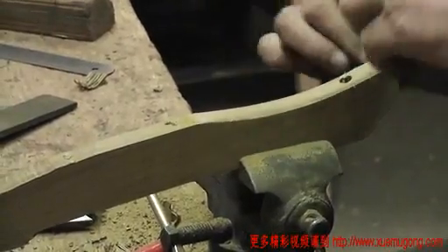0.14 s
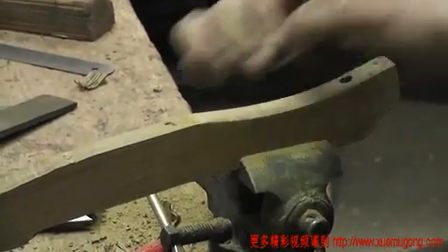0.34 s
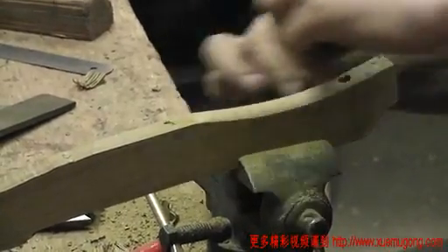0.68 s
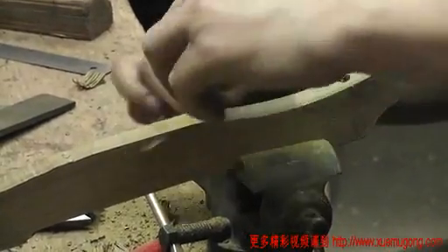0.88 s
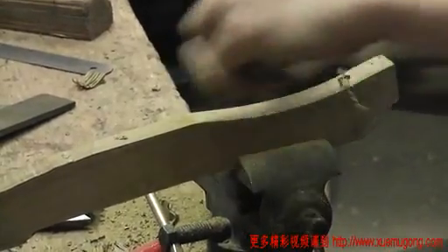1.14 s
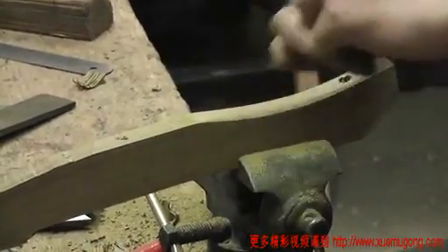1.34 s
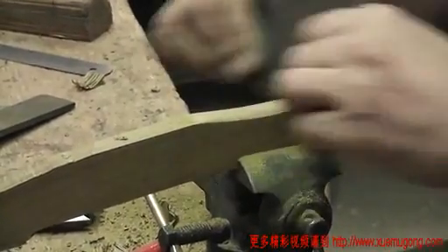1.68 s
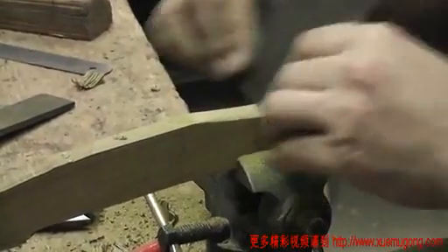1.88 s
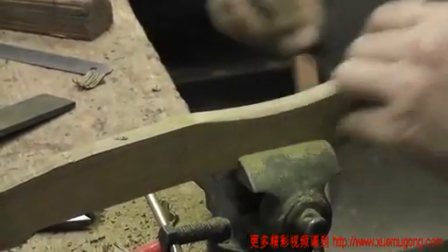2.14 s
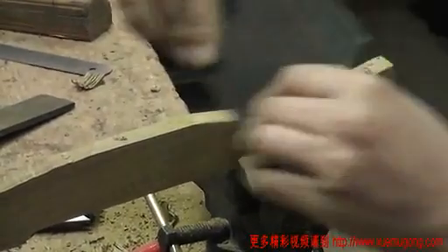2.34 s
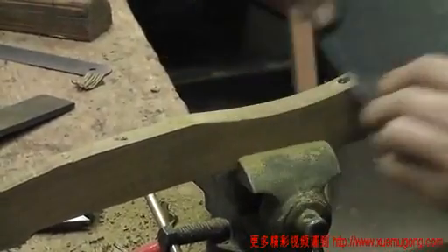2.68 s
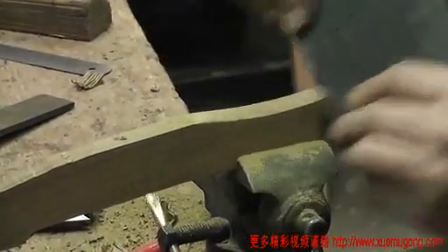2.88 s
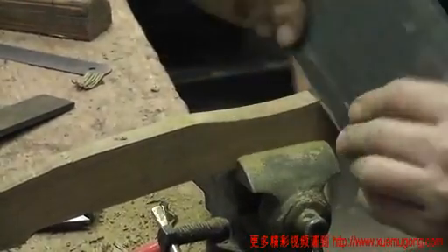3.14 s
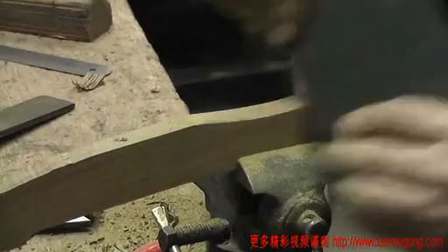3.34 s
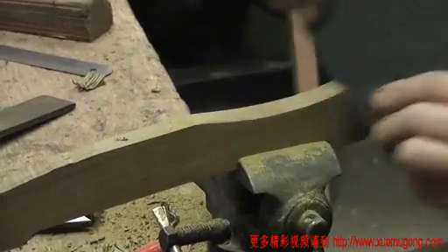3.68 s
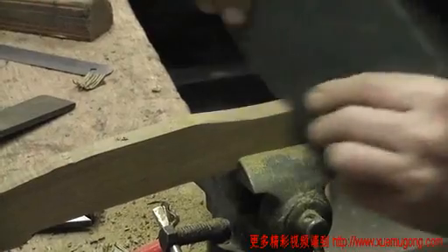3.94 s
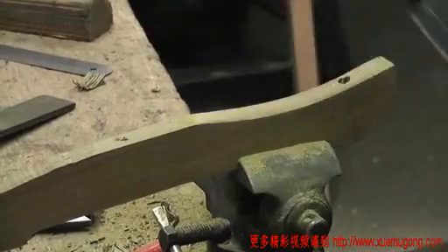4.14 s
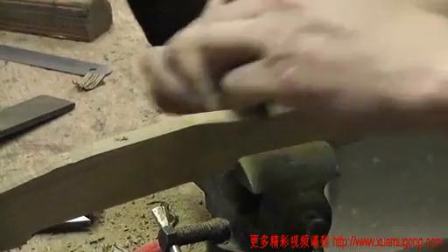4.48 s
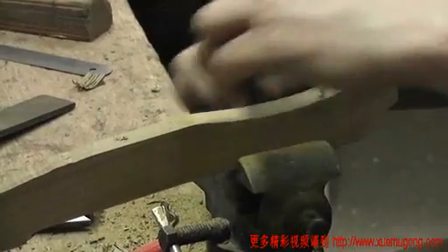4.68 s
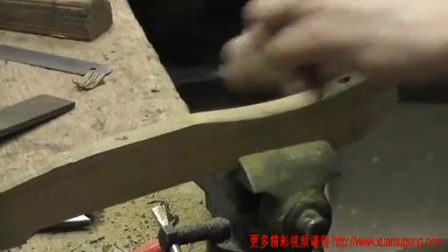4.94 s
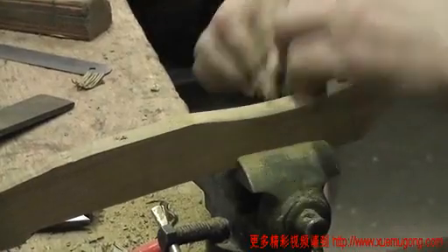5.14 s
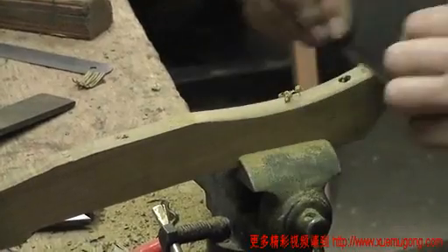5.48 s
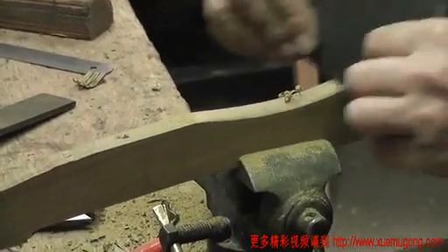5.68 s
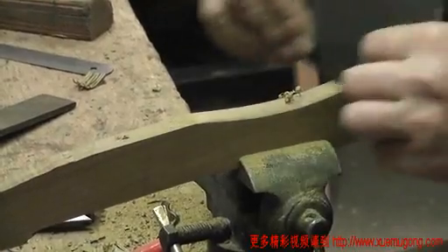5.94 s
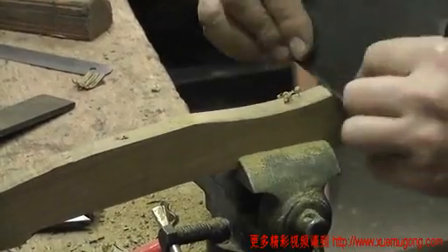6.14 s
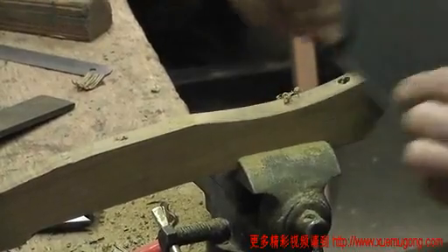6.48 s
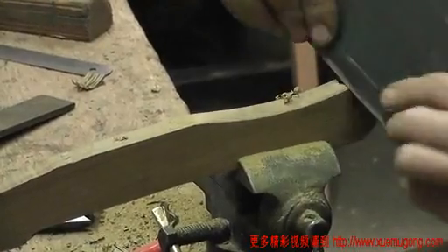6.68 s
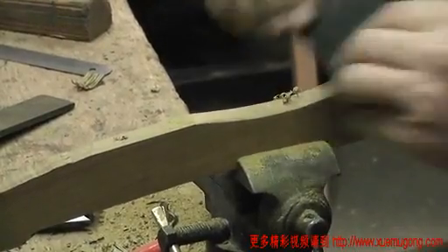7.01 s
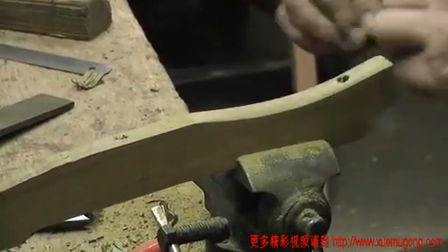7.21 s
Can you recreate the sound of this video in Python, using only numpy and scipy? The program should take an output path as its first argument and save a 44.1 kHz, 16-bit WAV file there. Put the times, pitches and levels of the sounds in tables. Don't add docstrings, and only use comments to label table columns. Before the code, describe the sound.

Short, dry scrapes of steel on wood come two to four a second, heard very close in stereo. Knocks mark the blade landing, and the edge sometimes judders so the wood and bench ring briefly. The middle strokes are spaced with small gaps, three stronger scrapes follow, then rapid little scratches with a sharp fibre snap, more knocks, a pause and a last stroke. Small room, quiet low hum.

```python
import sys
import numpy as np
from scipy import signal
from scipy.fft import rfft, irfft, next_fast_len
from scipy.io import wavfile
from scipy.ndimage import uniform_filter1d, minimum_filter1d, map_coordinates

SR = 44100
rng = np.random.default_rng(int(sys.argv[2]) if len(sys.argv) > 2 else 0)


def gain_from_decibels(decibels):
    exponent = np.asarray(decibels, float) / 20
    return 10 ** exponent


def dump_mix(stems):
    frames = np.atleast_2d(stems).T
    limited = np.clip(frames, -1, 1)
    pcm = np.round(limited * 32767).astype(np.int16)
    wavfile.write(sys.argv[1], SR, pcm)


N = 323253

# start_s, rise_s, hold_s, tear_db, plate_re_tear_db
TOP_CUTS = [(0.07, .044, .005, -24.5, -2.5), (0.485, 0.031, .12, -19.5, -8), (0.846, 0.039, 0.087, -20, -7),
            (1.196, 0.069, 0.094, -20, -5), (1.626, 0.02, 0.099, -19.5, -9.5), (1.827, 0.033, .01, -25, -4),
            (1.913, 0.042, 0.073, -19, -8.5), (2.081, 0.098, 0.058, -24, -1.5),
            (2.276, 0.015, 0.1, -21.5, -11.5), (4.43, 0.067, 0.083, -20, -7.5),
            (4.775, 0.077, 0.11, -18.5, -7.5), (5.168, 0.032, 0.051, -19, -8.5),
            (7.037, 0.02, 0.075, -17.5, -8)]
# start_s, rise_s, hold_s, tear_db, plate_re_tear_db
END_CUTS = [(2.578, 0.018, .13, -18, -5.5), (2.883, 0.038, 0.069, -21.5, -1),
            (3.134, 0.034, 0.05, -21.5, -2.5), (3.505, 0.053, 0.12, -19.5, -5),
            (3.895, 0.042, 0.1, -17, -9.5), (5.439, 0.014, 0.063, -21, -3.5),
            (5.544, 0.069, .005, -26.5, 3.5), (5.66, 0.019, 0.044, -24, -0.5),
            (5.774, 0.073, .005, -25.5, 1), (6.026, .028, 0.032, -29, 7), (6.186, 0.043, 0.0026, -22, -8),
            (5.866, 0.054, 0.055, -22, -2.5), (6.126, 0.031, 0.058, -23, -3),
            (6.447, 0.014, 0.065, -19, -4), (6.718, 0.037, 0.015, -16, -9)]
# start_s, hold_s, tear_db, plate_re_tear_db
SKIDS = [(0.0, 0.11, -30.5, -3), (0.393, 0.049, -27.5, 0), (0.768, 0.029, -21, 2),
         (1.153, 0.01, -27.5, 1.5), (1.562, 0.095, -37, -1), (2.293, .02, -21, -10),
         (0.495, 0.025, -26, 0.5), (2.495, .08, -30, -3), (2.84, 0.0055, -30.5, -3.5),
         (3.101, 0.006, -26, 4.5), (3.373, 0.067, -28, -3), (3.852, 0.0052, -41, -3),
         (4.055, 0.14, -32, -4), (4.343, 0.08, -30.5, 0), (4.718, .06, -35.5, -3.5),
         (5.042, 0.068, -45, -1), (7.27, .02, -46.5, -3), (0.12, 0.14, -39.5, -6),
         (5.13, 0.0082, -29.5, -2), (5.36, 0.037, -32, -1), (6.264, 0.1, -31.5, -3.5),
         (6.397, 0.011, -32.5, 9), (6.555, 0.12, -30.5, -5.5), (6.702, 0.0052, -32.5, 12),
         (6.8, 0.14, -32, -2)]
# start_s, level_db, fade_db_per_s, upper_re_judder_db, bench_re_judder_db
JUDDERS = [(0.0, -30, 150, -4, 1), (0.392, -8.5, 224, -1, 1.5), (0.767, -23.5, 250, 9.5, -17),
           (1.153, -18.5, 202, 5, 6), (1.561, -24, 219, -1.5, 6), (1.837, -23.5, 136, -1.5, -3.5),
           (2.496, -33.5, 83, 5, 1), (2.841, -28.5, 200, -4, -1.5), (3.106, -13.5, 258, -5.5, -3),
           (3.379, -20.5, 150, -1, 4.5), (3.854, -31, 95, -5, 4), (4.346, -7.5, 204, -5, 1),
           (4.718, -22.5, 190, 2, 8.5), (5.133, -8.5, 418, -3, -10.5), (5.36, -21, 197, -3.5, -5),
           (6.05, -19, 186, -6.5, -12), (6.404, -9.5, 302, -5.5, -9), (6.706, -15, 262, -4.5, -6.5),
           (7.028, -25, 157, 1.5, -1.5)]
# start_s, rise_s, level_db, upper_re_judder_db, bench_re_judder_db
SWELLS = [
    (2.076, 0.17, -17, -2, -2.5),
    (2.52, 0.039, -21.5, -16, -8),
    (4.017, 0.041, -29, 0.5, 1),
    (4.9, 0.1, -36, -9, -2),
    (5.544, 0.085, -22.5, -6, -8),
    (5.79, 0.08, -18.5, -4.5, -13),
    (5.96, 0.06, -26, -9, -5),
    (6.8, 0.027, -33.5, -3, 8.5),
]
# start_s, hold_s, level_db, upper_re_judder_db, bench_re_judder_db
DRAGS = [(0.023, 0.14, -31, 0, 1.5), (0.774, 0.052, -19.5, 3.5, 0.5), (2.866, .17, -35, -3.5, -2),
         (3.426, 0.098, -35.5, 5.5, 8), (4.063, 0.1, -36.5, 1, 2), (5.45, 0.078, -37.5, 0, -3),
         (5.68, 0.14, -32, -4, -5.5), (6.144, .22, -34.5, 1, 2), (6.47, 0.18, -34, 2, 6),
         (6.775, 0.14, -37.5, 0.5, 3.5), (7.093, 0.05, -33, -12, -5)]
# rail_db, upper_db, bench_db
CUT_SHAKES_DB = (-33.5, -23, -32)
# rail_db, upper_db, bench_db
REST_DB = (-45.5, -47, -46.5)
# freq_hz, density_db_per_hz
TEAR_HISS = [(2350, -16), (4000, -6), (4820, -11), (5780, -7), (7210, -9.5), (8550, -5), (10500, -9),
             (12100, -7), (14700, -17), (15200, -19), (15500, -34)]
# freq_hz, width_hz, level_db
PLATE = [(1395, 500, -7.5), (1688, 106, 2.5), (1885, 200, -1), (2036, 28, 6.5), (2142, 118, -2.5),
         (2850, 470, -1), (3090, 70, 0.5), (3367, 81, 1), (3750, 57, -1), (4270, 290, -6)]
# freq_hz, width_hz, level_db
RAIL_LOW = [(342.4, 17.8, -3.5), (395.6, 26, -4), (466.6, 18, -13.5)]
# freq_hz, width_hz, level_db
RAIL_HIGH = [(492.4, 41.7, 1.5), (618, 70, 4), (747.4, 60.5, 4.5), (800, 119, 0.5), (1018, 57, -4.5),
             (1137, 84, -6.5)]
# freq_hz, width_hz, level_db
BENCH = [(136.6, 61, -4), (173.5, 20.6, 1.5), (221.5, 21.4, 2), (293.6, 28.5, 0)]
# freq_hz, t60_s
SHOP = [(150, 0.25), (2000, 0.051), (12000, 0.032)]
# freq_hz, level_db
NEARNESS = [(100, -37), (1000, -7.5), (12000, -10.5)]
# freq_hz, density_db_per_hz
AIR = [(25, -40), (50, 2.5), (83, 10.5), (100, -16), (150, 4.5), (462, -21), (790, -16), (1670, -10.5),
       (2500, -20), (6200, -22.5), (12800, -39), (15000, -42)]
# start_s, peak_db, crack_re_knock_db
LANDINGS = [(0.3896, 11, -13.5), (0.411, 1, -16), (0.773, -1, -24), (1.152, 2.5, -42), (1.189, -21, -35),
            (1.561, -6.5, -47), (1.841, -22, -20), (2.226, -5, -19), (2.85, -20.5, 9), (3.103, -3, -8),
            (3.38, -3.5, -22), (3.854, -9, -14.5), (4.344, 8, -25), (4.371, 2, -28), (4.717, 0.5, -35),
            (5.129, 5.5, -37), (5.361, -3.5, -23), (5.855, -6.5, 3.5), (6.053, -16, -23), (6.403, 8.5, -13),
            (6.705, 3.5, -26), (7.028, 3, -13.5)]
# start_s, peak_db
SNAPS = [
    (3.618, -18),
    (6.2333, 12),
    (6.528, -1),
]
# freq_hz, width_hz, level_db
THUMP = [(477, 120, 17), (1910, 360, -15)]
# start_s, rise_s, both_ports_db, opposite_sign_db
BUMPS = [
    (3.617, .0047, -23, -36),
    (3.5805, .0014, -45, -12),
    (6.2352, .0012, -40, -7),
]
# freq_hz, gain_db
WIDTH = [(40, 0), (200, -1), (2100, -4), (2600, -28), (5300, -14), (5600, -4.5), (6400, -0.5),
         (7200, -12.5), (10200, -13), (10500, 0.5), (12000, -4), (14500, -19)]

TOP_RISE_DB, TOP_SAG_DB_PER_S, TOP_LIFT_DB_PER_S = 16, 50, 224
END_RISE_DB, END_SAG_DB_PER_S, END_LIFT_DB_PER_S = 26.5, 41, 269
SKID_RISE_S, SKID_RISE_DB, SKID_SAG_DB_PER_S, SKID_LIFT_DB_PER_S = 0.0022, 9, 51, 288
DRAG_RISE_S, DRAG_RISE_DB, DRAG_SAG_DB_PER_S, DRAG_LIFT_DB_PER_S = 0.0074, 11, 19, 262
JUDDER_RISE_S, JUDDER_RISE_DB, JUDDER_HOLD_S = 0.0013, 2, 0.006
SWELL_RISE_DB, SWELL_FADE_DB_PER_S = 13.5, 304
BITE = 1.32
PLATE_FOLLOWS = 0.74
UPPER_FOLLOWS, BENCH_FOLLOWS = 1.63, 1
HOVER_DB, HOVER_PLATE_DB = -59.5, -53


def unit(x):
    return x / np.sqrt(np.mean(x ** 2) + 1e-20)


def along(points, hz):
    f, v = np.transpose(points)
    return np.interp(np.log(hz + 1), np.log(f + 1), v)


def wobble(rate_hz):
    knots = rng.standard_normal(int(N * rate_hz / SR) + 4)
    return map_coordinates(knots, [np.arange(N) * rate_hz / SR])


def filtered(x, response):
    m = next_fast_len(N + SR // 2)
    return irfft(rfft(x, m) * response(np.fft.rfftfreq(m, 1 / SR)), m)[..., :N]


def modes(table):
    def ring(f):
        total = 0
        for k, (freq_hz, width_hz, db) in enumerate(table):
            damping = 1j * f * width_hz
            total = total + (-1) ** k * gain_from_decibels(db) * damping / (freq_hz ** 2 - f * f + damping)
        return total

    return lambda f: ring(f) / np.sqrt(np.mean(np.abs(ring(f)) ** 2))


def slips(rate_hz, size_db, clump_db, smooth):
    hits = rng.random(N) < rate_hz / SR
    jolts = hits * rng.standard_normal(N) * gain_from_decibels(size_db * rng.standard_normal(N))
    force = unit(jolts) + smooth * rng.standard_normal(N)
    return unit(force * gain_from_decibels(clump_db * wobble(70)))


def patchy(x, depth_db, bins, frames):
    z = signal.stft(x, nperseg=512)[2]
    field = uniform_filter1d(rng.standard_normal(z.shape), bins, 0)
    field = uniform_filter1d(field, frames, 1)
    return signal.istft(z * gain_from_decibels(depth_db * unit(field)), nperseg=512)[1][:N]


def shape(rise_s, hold_s, rise_db, sag_db_per_s, lift_db_per_s):
    t = np.arange(SR // 2) / SR - rise_s
    climb = -rise_db * np.abs(t / rise_s) ** BITE
    fall = -sag_db_per_s * t - lift_db_per_s * np.maximum(t - hold_s, 0)
    return np.where(t < 0, climb, fall)


def add(power, start_s, shape_db, levels_db, follows):
    k = round(start_s * SR)
    power[:, k:k + len(shape_db)] += gain_from_decibels(2 * (np.c_[levels_db] + np.c_[follows] * shape_db))


def tearing():
    power = np.ones(N + SR) * gain_from_decibels(2 * np.c_[[HOVER_DB, HOVER_PLATE_DB]])
    events = []
    for s, rise, hold, db, plate_db in TOP_CUTS:
        events.append((s, db, plate_db, shape(rise, hold, TOP_RISE_DB, TOP_SAG_DB_PER_S, TOP_LIFT_DB_PER_S)))
    for s, rise, hold, db, plate_db in END_CUTS:
        events.append((s, db, plate_db, shape(rise, hold, END_RISE_DB, END_SAG_DB_PER_S, END_LIFT_DB_PER_S)))
    for s, hold, db, plate_db in SKIDS:
        skid = shape(SKID_RISE_S, hold, SKID_RISE_DB, SKID_SAG_DB_PER_S, SKID_LIFT_DB_PER_S)
        events.append((s, db, plate_db, skid))
    for s, db, plate_db, shape_db in events:
        add(power, s, shape_db, [db, db + plate_db], [1, PLATE_FOLLOWS])
    return np.sqrt(power[:, :N])


def juddering(tear):
    power = np.ones(N + SR) * gain_from_decibels(2 * np.c_[list(REST_DB)])
    events = []
    for s, db, fade, upper_db, bench_db in JUDDERS:
        events.append((s, db, upper_db, bench_db, shape(JUDDER_RISE_S, JUDDER_HOLD_S, JUDDER_RISE_DB, 0, fade)))
    for s, rise, db, upper_db, bench_db in SWELLS:
        events.append((s, db, upper_db, bench_db, shape(rise, 0, SWELL_RISE_DB, 0, SWELL_FADE_DB_PER_S)))
    for s, hold, db, upper_db, bench_db in DRAGS:
        drag = shape(DRAG_RISE_S, hold, DRAG_RISE_DB, DRAG_SAG_DB_PER_S, DRAG_LIFT_DB_PER_S)
        events.append((s, db, upper_db, bench_db, drag))
    for s, db, upper_db, bench_db, shape_db in events:
        levels_db = [db, db + upper_db, db + bench_db]
        add(power, s, shape_db, levels_db, [1, UPPER_FOLLOWS, BENCH_FOLLOWS])
    shaken = tear * gain_from_decibels(np.c_[list(CUT_SHAKES_DB)])
    return np.sqrt(power[:, :N] + shaken ** 2)


def strokes():
    tear_gain, plate_gain = tearing()
    low_gain, upper_gain, bench_gain = juddering(tear_gain)
    fibres = slips(7000, size_db=1.0, clump_db=1.0, smooth=1.0)
    chatter = slips(2500, size_db=5.0, clump_db=0, smooth=0.87)
    judder = slips(900, size_db=3.0, clump_db=0.5, smooth=0.96)

    bands = patchy(fibres, depth_db=1.6, bins=10, frames=16)
    bands = unit(patchy(bands, depth_db=1.6, bins=2, frames=12))
    colour = lambda f: gain_from_decibels(along(TEAR_HISS, f)) / np.sqrt(np.mean(gain_from_decibels(2 * along(TEAR_HISS, f))))
    hiss = filtered(tear_gain * bands, colour)

    rub = unit(patchy(0.42 * fibres + 1.12 * chatter, depth_db=3.5, bins=3, frames=14))
    plate = filtered(plate_gain * rub, modes(PLATE))
    rail = filtered(low_gain * judder, modes(RAIL_LOW))
    rail += filtered(upper_gain * judder, modes(RAIL_HIGH))
    bench = filtered(bench_gain * judder, modes(BENCH))
    return hiss + plate + rail + bench


def spread(x):
    t = np.arange(SR // 25) / SR
    near = rng.standard_normal(len(t)) * gain_from_decibels(-60 * t / 0.021)
    balance = wobble(5.1)
    reflected = signal.fftconvolve(x, near / np.linalg.norm(near))[:N]
    return gain_from_decibels(-5.5) * balance * reflected * [[1], [-1]]


def shop(x):
    hz, t, z = signal.stft(rng.standard_normal((2, SR // 2)), SR, nperseg=256)
    decay = gain_from_decibels(-60 * t / along(SHOP, hz)[:, None])
    tail = signal.istft(z * decay, SR, nperseg=256)[1]
    late = np.pad(x, (130, 0))[None]
    echo = signal.fftconvolve(late, tail / np.linalg.norm(tail[0]), axes=1)[:, :N]
    return filtered(echo, lambda f: gain_from_decibels(along(NEARNESS, f)))


def air():
    a, b = filtered(rng.standard_normal((2, N)), lambda f: gain_from_decibels(along(AIR, f)))
    ports = unit(np.array([a + 0.6 * b, a - 0.75 * b]))
    return gain_from_decibels(-42 + 2.5 * wobble(3.9)) * ports


def landings():
    push, crack = np.zeros(N + SR), np.zeros(N + SR)
    t = np.arange(SR // 20) / SR
    for s, db, crack_db in LANDINGS:
        k = round(s * SR)
        push[k + 66:][:len(t)] += gain_from_decibels(db) * np.exp(-.5 * (t / 0.00011 - 2) ** 2)
        crack[k:][:len(t)] += gain_from_decibels(db + crack_db - 60 * t / 0.037) * rng.standard_normal(len(t))
    for s, db in SNAPS:
        crack[round(s * SR):][:len(t)] += gain_from_decibels(db - 6 - 60 * t / 0.02) * rng.standard_normal(len(t))
    push, crack = push[:N], crack[:N]
    thump = gain_from_decibels(-13.5) * filtered(-push, modes(THUMP))
    body = gain_from_decibels(-16.0) * filtered(push, modes(RAIL_LOW + BENCH))
    bright = gain_from_decibels(-20) * filtered(crack, lambda f: 1j * f / (1500 + 1j * f))
    plate = gain_from_decibels(-13) * filtered(crack, modes(PLATE))
    return thump + body + bright + plate


def bump():
    s, rise, both_db, across_db = np.transpose(BUMPS)
    u = np.maximum(np.arange(N) / SR - s[:, None], 0) / rise[:, None]
    pulses = np.e * u * (2 - u) * np.exp(-u)
    both, across = gain_from_decibels([both_db, across_db]) @ pulses
    return both + across * [[1], [-1]]


def scene():
    work = strokes() + landings()
    return work + spread(work) + shop(work) + air() + bump()


def limiter(x, top, hold_s):
    need = np.minimum(1, top / (np.abs(x).max(axis=0) + 1e-9)) ** 0.42
    span = round(hold_s * SR)
    held = minimum_filter1d(need, span, origin=span // 2 - 30)
    return x * uniform_filter1d(held, 60)


def top_cut(x):
    return signal.sosfilt(signal.butter(12, 15640, fs=SR, output="sos"), x)


def record(dry):
    mid = dry.mean(axis=0)
    side = filtered(dry[0] - mid, lambda f: gain_from_decibels(along(WIDTH, f)))
    ports = np.array([mid + side, mid - side]) * gain_from_decibels([[.1], [-.1]])
    notch = lambda f: 1 - .95 * 1j * f * 140 / (2560 ** 2 - f * f + 1j * f * 140)
    low_cut = lambda f: (1j * f / (60 + 1j * f)) ** 2
    high_cut = lambda f: gain_from_decibels(-60 * np.clip((f - 14950) / 400, 0, 1))
    heard = filtered(ports, lambda f: notch(f) * low_cut(f) * high_cut(f))
    mix = limiter(heard, top=0.48, hold_s=0.011)
    return top_cut(mix)


dry = scene()
out = record(dry)
dump_mix(out)
```